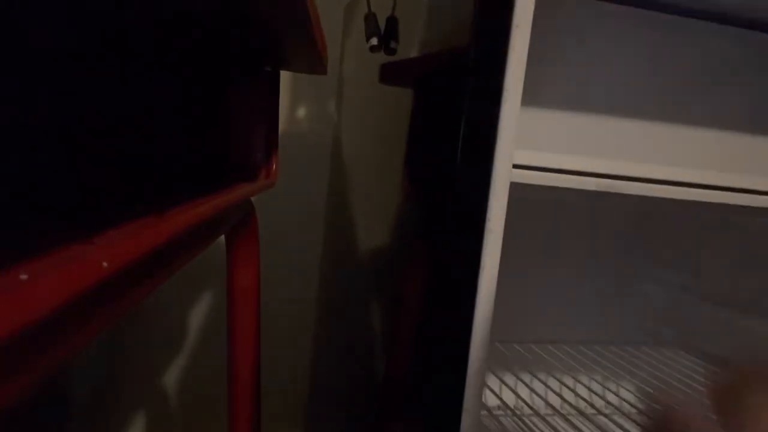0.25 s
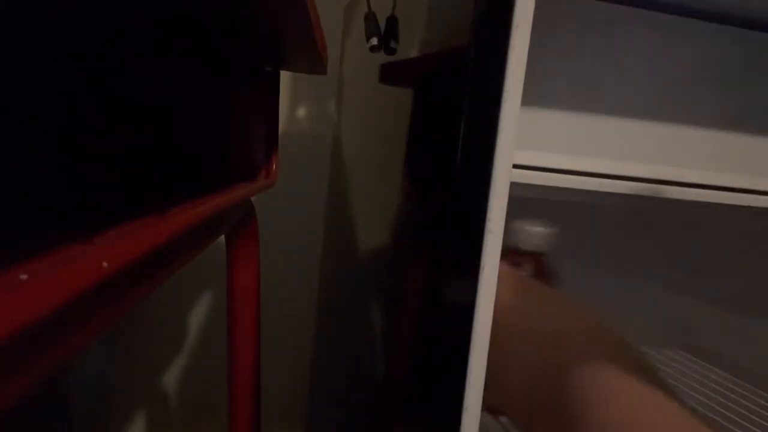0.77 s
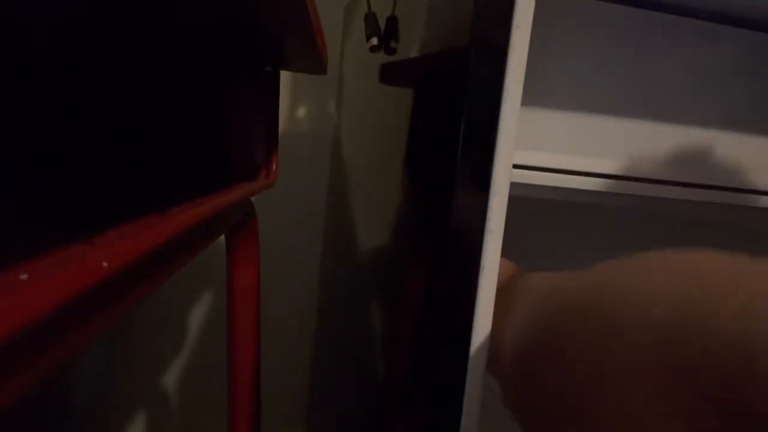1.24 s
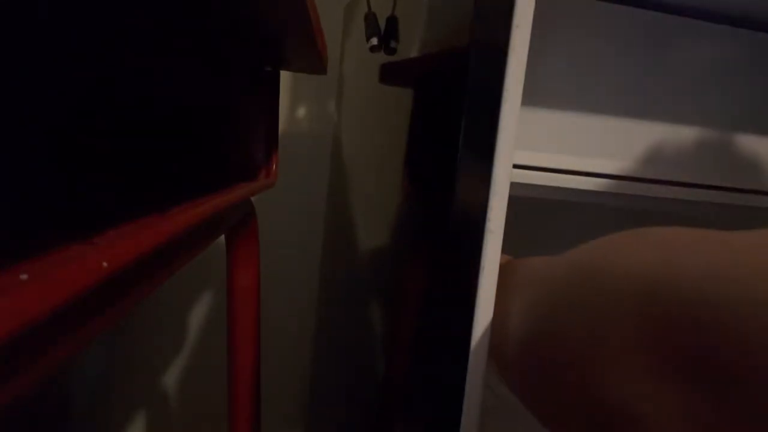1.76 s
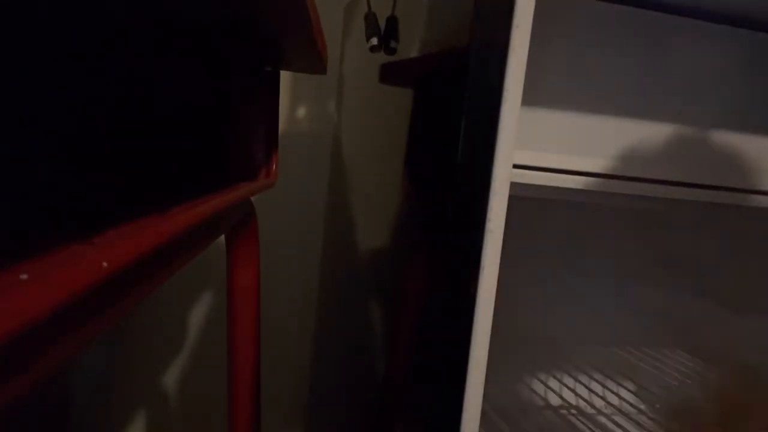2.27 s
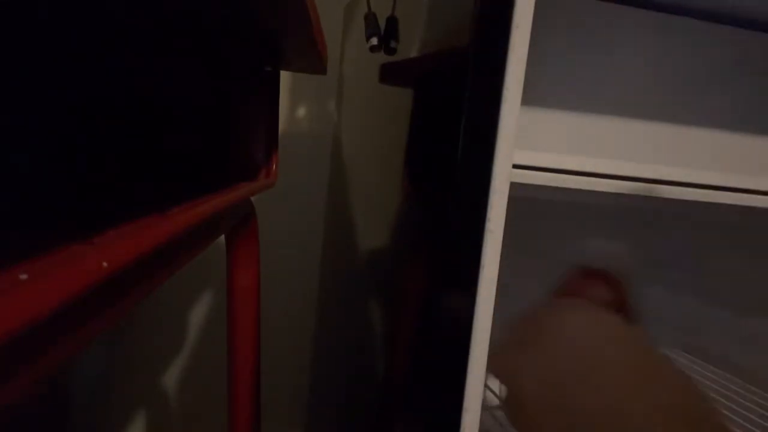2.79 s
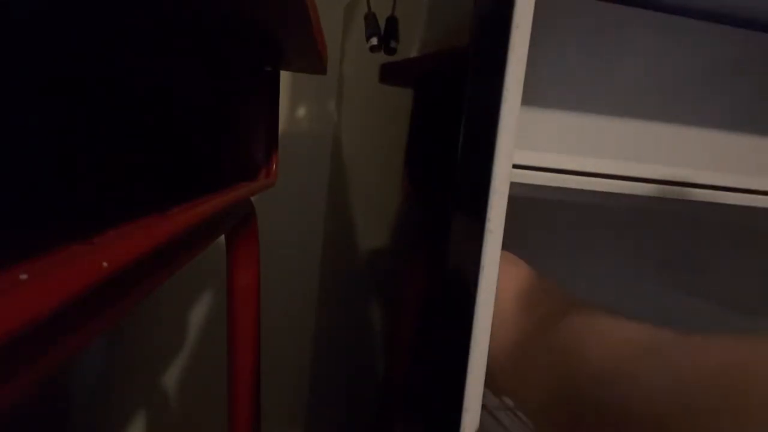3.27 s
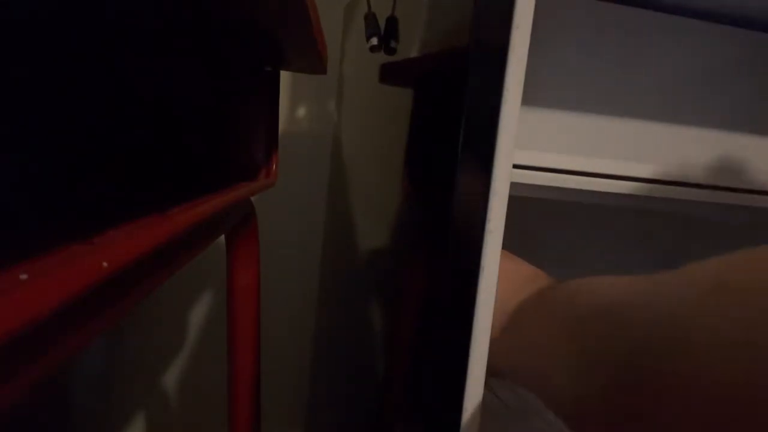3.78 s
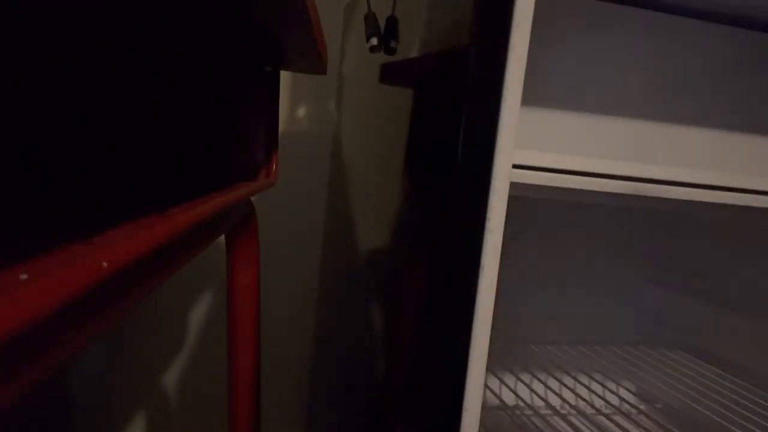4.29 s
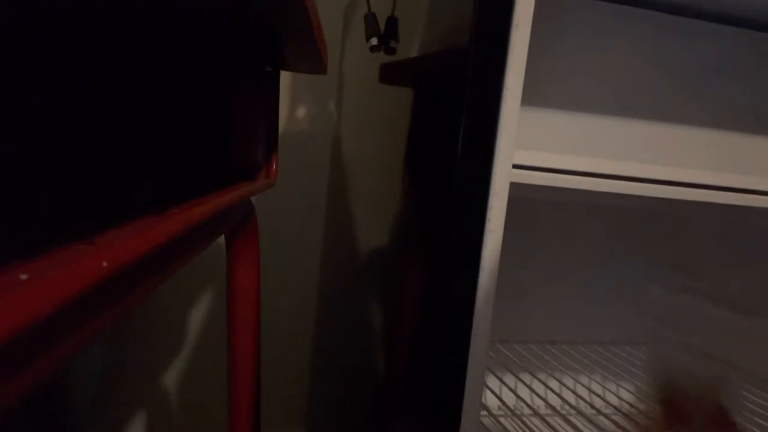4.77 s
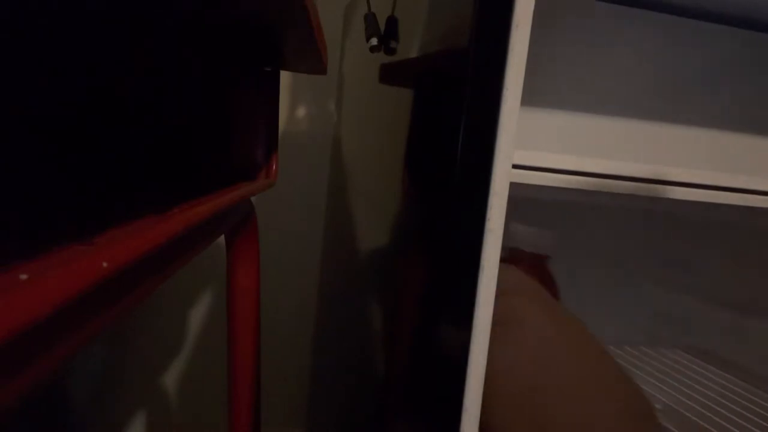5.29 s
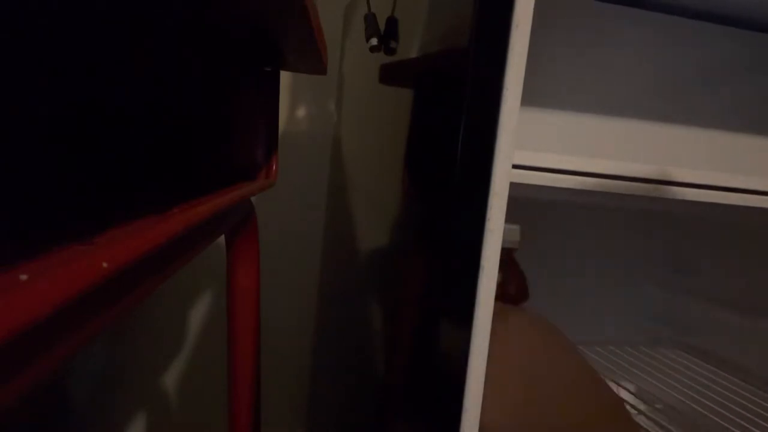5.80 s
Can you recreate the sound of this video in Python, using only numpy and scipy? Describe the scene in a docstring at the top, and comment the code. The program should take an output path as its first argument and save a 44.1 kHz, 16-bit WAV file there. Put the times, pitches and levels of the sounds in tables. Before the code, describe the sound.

Close, wide stereo: bottles rock onto thin metal wires in an empty fridge, ringing and booming three times, with faint finger ticks between.

```python
"""Bottles on a fridge shelf

Bottles are set down one by one on the wire shelf of a small open fridge, heard in a wide stereo image.
Decaying modes make the cabinet boom, the wires ring and the frame linger; noise bursts make rattles, cracks,
ticks of fingers and labels, and a sliding hand. One wire, a drifting sine, sings on in spells.
Coloured noise hums, drones, hisses and rustles underneath, with thin whistles made of wandering tones.
The level dips briefly three times; left and right differ in phase and balance from band to band."""
import sys
import numpy as np
from scipy import signal
from scipy.fft import rfft, irfft, next_fast_len
from scipy.io import wavfile
from scipy.ndimage import uniform_filter1d, map_coordinates

SR = 44100
rng = np.random.default_rng(int(sys.argv[2]) if len(sys.argv) > 2 else 0)


def how_loud(loudness_db):
    """Turn decibels into a plain amplitude multiplier (0 dB gives 1, 20 dB gives 10)."""
    steps = np.asarray(loudness_db, float) / 20
    return 10 ** steps


def generate_wav(signal):
    """Clip the signal to [-1, 1] and save it as 16-bit WAV at the path in sys.argv[1]."""
    frames = np.transpose(np.atleast_2d(signal))
    scaled = np.clip(frames, -1, 1) * 32767
    pcm = np.round(scaled).astype(np.int16)
    wavfile.write(sys.argv[1], SR, pcm)


N = 266584

# bottle on shelf contacts, before the trims of each layer: (time [s], wires [dB],
# cabinet [dB re wires], rattle [dB re wires], crack [dB re wires])
CONTACTS = [(0.735, -40, -10, -2.5, -5.5), (0.747, -37, 7, -4, -16), (0.751, -29.5, 19, -15, -11.5),
            (0.763, -36.5, -1, -2, -22), (0.783, -16, 7.5, -12, -20.5), (0.809, -31.5, 18.5, -2, -18),
            (0.832, -16.5, -6.5, -10.5, -19.5), (0.847, -17.5, -6, -17, -66), (0.869, -29, 14.5, -10, -33),
            (0.893, -30.5, 1, -10, -29), (0.926, -24, 7.5, -20, -39), (0.959, -30, 6, -23, -40),
            (0.998, -27.5, 5, -25, -37), (1.128, -47.5, 26.5, -5.5, -19), (1.172, -40, 16.5, -29, -8),
            (2.753, -29.5, -9, -17, -7), (2.761, -18, 9, -13.5, -23), (2.784, -17.5, 9, -31, -38),
            (2.801, -17, 8.5, -24, -27), (2.827, -15.5, 8.5, -18, -31), (2.86, -28, -16, -13.5, -25),
            (2.879, -21, 4, -31, -43), (2.904, -37, 9, -30, -40), (2.939, -28, 9.5, -20, -36),
            (2.965, -41.5, -4, -4, -18), (2.988, -23.5, 6, -17.5, -30), (3.025, -32, 14, -13, -16),
            (3.046, -33, -8, -11.5, -28), (3.093, -38, 19, -22, -22), (3.261, -46, 19.5, -10.5, -35),
            (5.095, -31.5, -8, -11, -11), (5.106, -18.5, -1, -16.5, -17), (5.114, -19, 12.5, -17, -37),
            (5.137, -17.5, 2.5, -17, -31), (5.16, -19.5, -11, -28, -24.5), (5.183, -20.5, 2.5, -42, -29),
            (5.21, -32, -2, -37, -37), (5.237, -44.5, 15, -24, -5), (5.269, -37, 2, -6, -14),
            (5.299, -37.5, 15.5, -31, -21), (5.869, -47.5, -9, -5, -9), (5.904, -46, 22.5, -9, -25),
            (5.951, -44, 19.5, -7.5, -22)]
# a bottle lands: (first touch [s], strength [dB], rise of the shelf's shudder [s],
# t60 of the shudder [s], brightness of the frame [dB per octave])
LANDINGS = [(0.735, -33, 0.16, 0.81, 2), (2.752, -31.5, 0.27, 1.35, -1), (5.094, -31.5, 0.087, 0.87, -1.5)]
# air in the cabinet: (frequency [Hz], density [dB per Hz])
CAVITY = [(60, -71), (150, -10), (450, 9), (700, -10.5), (1500, -17), (3000, -24), (6000, -33)]
# sharp top of a hard contact: (frequency [Hz], density [dB per Hz])
CRACK = [(5000, -51), (7000, 8), (11000, -6), (12500, 0), (13500, -11), (15800, -6)]
# dull body of a touch: (frequency [Hz], density [dB per Hz])
TAP = [(700, -6), (1100, 11), (1700, 13.5), (2500, 4.5), (3500, -12), (5000, -38)]
# brief dips of the level: (centre [s], half length [s])
DIPS = [(0.118, 0.044), (2.447, 0.031), (4.615, 0.032)]


def unit(x):
    """Each row brought to rms 1."""
    return x / np.sqrt(np.mean(x ** 2, -1, keepdims=True) + 1e-20)


def filtered(x, response):
    """x times a complex response of frequency."""
    m = next_fast_len(x.shape[-1] + 4096)
    return irfft(rfft(x, m) * response(np.fft.rfftfreq(m, 1 / SR)), m)[..., :x.shape[-1]]


def noise(spectrum, size=N):
    """Two unrelated noises of rms 1 coloured by (Hz, dB) points."""
    f, db = np.transpose(spectrum)

    def colour(hz):
        return how_loud(np.interp(np.log(hz + 1), np.log(f), db, left=-120, right=-120))
    return unit(filtered(rng.standard_normal((2, size)), colour))


def wobble(rate):
    """A smooth random curve, rate knots a second."""
    knots = rng.standard_normal(int(N * rate / SR) + 4)
    return map_coordinates(knots, [np.arange(N) * rate / SR])


def add(track, s, sound):
    """Mixes a sound into the track from time s."""
    part = track[:, round(s * SR):][:, :sound.shape[1]]
    part += sound[:, :part.shape[1]]


def puffs(spectrum, times, dbs, t60, attack, grain_db):
    """Bursts of coloured noise that die away; a fast random gain makes them grainy."""
    power, t = np.zeros((1, N)), np.arange(SR // 2) / SR
    for s, db, fall in np.broadcast(times, dbs, t60):
        envelope = how_loud(db - 60 * t / fall) * (1 - np.exp(-t / attack))
        add(power, s, envelope[None] ** 2)
    return np.sqrt(power) * noise(spectrum) * unit(how_loud(grain_db * wobble(400)))


def patchy(x, depth_db):
    """Random patches of gain over time and frequency, the same in both fields."""
    z = signal.stft(x, nperseg=512)[2]
    field = rng.standard_normal(z.shape[1:])
    field = uniform_filter1d(uniform_filter1d(field, size=2, axis=0), size=12, axis=1)
    return signal.istft(z * how_loud(depth_db * field / field.std()), nperseg=512)[1][:, :N]


def ringer(modes, attack, scatter_db, split, loose=1, wander=0, sides=(-1j, 1j)):
    """A striker for decaying modes, each a close beating pair, a quarter turn apart in the two fields."""
    hz, db, t60 = np.repeat(np.transpose(modes), 2, axis=1)[:, :, None]
    hz = hz * (1 + split * np.resize([-1, 1], hz.shape))
    t = np.arange(SR * 3 // 5) / SR
    bank = how_loud(db - 60 * t / t60) * np.exp(2j * np.pi * hz * t) * (1 - np.exp(-t / attack))

    def strike(near_hz=1, fall_db=0):
        """One blow with new phases and strengths, weaker by fall_db per octave away from near_hz."""
        size, turn = rng.standard_normal(len(hz)), rng.random(len(hz))
        side = rng.choice(sides, len(hz))
        favour = how_loud(-fall_db * abs(np.log2(hz[:, 0] / near_hz)))
        favour = favour / np.linalg.norm(favour * how_loud(db[:, 0]))
        blow = favour * how_loud(scatter_db * size) * np.exp(2j * np.pi * (loose * turn - 1 / 4))
        fields = (np.array([blow, side * blow]) @ bank).real
        # each blow's pitch is off by a small random amount
        bent = np.arange(len(t)) * (1 + wander * rng.standard_normal())
        return np.array([np.interp(bent, np.arange(len(t)), y) for y in fields])
    return strike


def fridge_and_arm():
    """Noise bands: hum and drone swell as the shelf shudders; rustle and hiss follow the arm."""
    # all four spectra: (frequency [Hz], density [dB per Hz])
    hiss_spectrum = [(2600, -20), (3300, 1.5), (4200, 3), (5000, 1.5), (8000, 2), (10000, -3), (12500, -5),
                     (13600, -6.5), (14200, -20), (15700, -10)]
    hum_spectrum = [(22, -32), (32, -45), (45, -3), (60, -1.5), (85, -3.5), (125, 1.5), (180, -0.5),
                    (250, -9), (330, -56)]
    drone_spectrum = [(220, -11), (300, -3), (377, 3.5), (450, -5.5), (620, -7.5), (800, -18.5),
                      (1100, -18.5), (1500, -90)]
    rustle_spectrum = [(900, 1), (1250, 0.5), (1600, -3), (2300, -1.5), (3000, -2), (3600, -43)]
    # arm and sleeve moving: (time [s], rustle before its swell [dB])
    movement = [(0, -62), (.15, -65.5), (.34, -65.5), (.69, -67.5), (.95, -59), (1.4, -63), (1.92, -63.5),
                (2.05, -67.5), (2.37, -64), (2.7, -67.5), (3.0, -56.5), (3.2, -67.5), (3.36, -66),
                (3.73, -69), (3.76, -62), (3.89, -61), (3.97, -66), (4.4, -61), (4.55, -61), (4.76, -66),
                (5.2, -64), (6.04, -65.5)]
    t = np.arange(N) / SR
    shudder = np.zeros(N)
    for s, db, rise, t60, _ in LANDINGS:
        decay = how_loud(db - 60 * np.maximum(t - s - rise, 0) / t60)
        shudder += decay * np.clip((t - s) / rise, 0, 1)
    moving_db = np.interp(t, *np.transpose(movement))
    # the hiss takes nearly all of the movement's swing
    hiss = how_loud(-63 + 0.98 * (moving_db - moving_db.mean()))
    hum = np.hypot(how_loud(-44), shudder)
    drone = np.hypot(how_loud(-49), how_loud(-6) * shudder)
    layers = [(hiss, hiss_spectrum, 1.84), (hum, hum_spectrum, 0.24),
              (drone, drone_spectrum, 1.06), (how_loud(moving_db), rustle_spectrum, 0.12)]
    out = np.zeros((2, N))
    for level, spectrum, swell_db in layers:
        out += level * how_loud(swell_db * wobble(13)) * noise(spectrum)
    return patchy(out, depth_db=2.5)


def whistles():
    """Whistles of the cooling circuit: a slow random phasor spreads each tone into a narrow band."""
    # (frequency [Hz], nominal width [Hz], level before drift and flicker [dB], from [s], to [s])
    whines = [(364.4, 18, -52.5, 3.5, 5.3), (2760, 20, -77, 0.9, 7.1), (2880, 20, -79, -0.5, 0.8),
              (2830, 40, -76, 2.46, 2.8), (2400, 30, -76, 2.25, 4.7), (2050, 25, -76, 3.7, 7.1),
              (3200, 30, -79, 1.2, 4.7), (3310, 50, -79, -0.5, 7.1), (4790, 40, -73, 1.95, 2.44),
              (4800, 90, -81, -0.5, 5.4), (4910, 45, -70, 2.46, 3.08), (4900, 80, -74, 4.14, 4.36),
              (4830, 120, -72, 5.42, 5.66), (5190, 200, -77, 1.1, 7.1)]
    edge_s, flicker_db = 0.06, 2
    out, t = np.zeros((2, N)), np.arange(N) / SR
    for hz, width_hz, db, start, end in whines:
        phasor = wobble(width_hz) + 1j * wobble(width_hz)
        tone = how_loud(db + flicker_db * wobble(9.8)) * phasor * np.exp(2j * np.pi * hz * t)
        tone = tone * np.clip(np.minimum(t - start, end - t) / edge_s + 0.5, 0, 1)
        out += [tone.real, tone.imag]
    return out


def opening_shudder():
    """Low decaying sines, cut at the centre of the first dip, while the cavity rings as fading noise."""
    # (frequency [Hz], level [dB], t60 [s])
    low_tones = [(36, -29, 1), (91, -34.5, 0.97), (126, -45, 0.59)]
    out, t = np.zeros((2, N)), np.arange(N) / SR
    for hz, db, t60 in low_tones:
        out[0] += how_loud(db - 60 * t / t60) * np.sin(2 * np.pi * hz * t) * (t < DIPS[0][0])
    return out + puffs(CAVITY, 0, -33.5, 0.26, 0.0092, grain_db=-11.5)


def ticks():
    """Fingers, caps and labels touch: dry noise bursts with a dull body and a sharp crack."""
    # before the trims of each layer: (time [s], level [dB], low part [dB re level], crack [dB re level])
    touches = [(0.194, -45, -4.5, -10.5), (0.258, -55.5, 9, -21), (0.346, -42, -3, -18),
               (0.454, -54, 13, -21), (1.773, -40.5, 0.5, -15), (1.833, -46, -4, -14),
               (1.85, -51, 7, -15.5), (1.889, -39.5, 9, -16.5), (2.481, -47, -3, -20),
               (3.784, -60.5, -24, 2), (5.0371, -28, 3, -23.5), (5.239, -44, -10, -9.5),
               (5.3363, -35, -2, -18), (5.423, -42.5, -17, -10.5), (5.4394, -48.5, -18, -10),
               (5.579, -50, -28, -12), (5.6455, -33, -38, -11), (5.866, -43, -14, -11),
               (5.874, -39, -20, -12.5), (5.915, -40, -3, -21), (5.93, -38, -0.5, -9),
               (6.033, -50.5, 4, -9.5)]
    # (frequency [Hz], density [dB per Hz])
    tick_spectrum = [(2000, -10), (3000, 2), (4500, 2.5), (6500, 3), (9000, -14), (11000, -79)]
    s, db, low_db, crack_db = np.transpose(touches)
    t60 = 0.076  # seconds
    out = puffs(tick_spectrum, s, db - 6.0, t60, 0.001, grain_db=-2.0)
    out += puffs(TAP, s, db + low_db - 8.5, t60, 0.0012, grain_db=-6.0)
    return out + puffs(CRACK, s, db + crack_db + 10.0, 0.068, 0.00069, grain_db=3.0)


def shelf_ringing():
    """Each contact sets off decaying modes of cabinet and wires; the next one stifles them."""
    # all three sets of modes: (frequency [Hz], relative level [dB], t60 when not stifled [s])
    cabinet_modes = [(114, -53, 0.43), (129, 10, 0.12), (153.3, 4.5, 0.44), (213.2, -3.5, 0.28)]
    wire_modes = [(275, -11.5, 0.21), (302, -0.5, 0.14), (372.3, -11, 0.3), (437.3, -2.5, 0.17),
                  (483.4, -2.5, 0.28), (570, 1.5, 0.089), (629, -5.5, 0.45), (691.4, -11.5, 0.16)]
    upper_modes = [(827, 8.5, 0.11), (869, 4.5, 0.42), (950, 1, 0.19), (1006, 7.5, 0.25), (1085, 5, 0.29),
                   (1216, -7.5, 1), (1291, -2, 0.22), (1340, 9, 0.21), (1640, -7, 0.15), (1893, 3, 0.16),
                   (2066, -16, 0.63), (2177, 1, 0.17), (2230, -3.5, 0.2), (2367, 3.5, 0.24),
                   (2615, 3.5, 0.095), (2830, 1, 0.066), (3100, -4, 0.044), (3250, -4, 0.16),
                   (3300, -22, 0.13)]
    # the rocking bottle's contact wanders over the shelf: (time [s], pitch of the wires struck best [Hz])
    contact_path = [(0.75, 367), (0.783, 487), (0.81, 605), (0.832, 430), (0.847, 475), (0.869, 560),
                    (0.893, 600), (0.925, 560), (1.0, 624), (2.753, 400), (2.784, 440), (2.801, 537),
                    (2.827, 477), (2.879, 553), (2.94, 530), (3.0, 614), (3.26, 620), (5.096, 448.5),
                    (5.114, 410), (5.137, 300), (5.16, 362), (5.183, 564), (5.24, 614)]
    # each bottle stands elsewhere: (time [s], pitch of the upper modes struck best [Hz])
    footing = [(0.8, 1120), (2.8, 2900), (5.1, 1010)]
    choke_db, choke_s = 14, 0.0073  # full stifling, and its time constant
    # a soft push starts the panels nearly in step
    cabinet = ringer(cabinet_modes, 0.012, scatter_db=0.0, split=0.013, loose=0.3)
    wires = ringer(wire_modes, 0.00084, scatter_db=2.5, split=0.011, wander=0.0097, sides=[1j, 1j, -1j])
    upper = ringer(upper_modes, 0.00055, scatter_db=3.5, split=0.0121, wander=0.0195)
    out, t = np.zeros((2, N)), np.arange(SR * 3 // 5) / SR
    for now, following in zip(CONTACTS, CONTACTS[1:] + CONTACTS[:1]):
        s, db, boom_db, rattle_db, _ = now
        then, next_db, next_boom_db, *_ = following
        # the last contact is followed by none, so nothing stifles it
        stifled = (then > s) * (1 - np.exp(-np.maximum(t - then + s, 0) / choke_s))

        def choke(over_db):
            """A much weaker next contact stifles little."""
            return how_loud(-choke_db * stifled / (1 + how_loud(2 * over_db)))
        boom = how_loud(db + boom_db - 3.5) * cabinet()
        boom = boom * choke(db + boom_db - next_db - next_boom_db)
        wire_hz = np.interp(s, *np.transpose(contact_path))
        upper_hz = np.interp(s, *np.transpose(footing))
        ring = how_loud(db - 1.0) * wires(wire_hz, fall_db=17.5)
        ring += how_loud(db + rattle_db + 2.5) * upper(upper_hz, fall_db=1)
        add(out, s, boom + choke(db - next_db) * ring)
    return out


def shelf_rattle():
    """At each contact noise bursts make the wires rattle and crack and fill the cavity."""
    # (frequency [Hz], density [dB per Hz])
    rattle_spectrum = [(700, -36), (1000, -20), (1500, -5), (2200, 0.5), (3500, 3), (5000, -3), (7000, 0),
                       (9000, -28)]
    s, db, _, rattle_db, crack_db = np.transpose(CONTACTS)
    out = puffs(rattle_spectrum, s, db + rattle_db - 7.0, 0.1, 0.00047, grain_db=1.0)
    out += puffs(CRACK, s, db + crack_db + 0.5, 0.12, 0.0016, grain_db=5.0)
    return out + puffs(CAVITY, s, db - 9.5, 0.22, 0.004, grain_db=-1.5)


def lingering_frame():
    """Frame and cabinet tones die slowly after each landing, fluttering in level and phase."""
    # (frequency [Hz], level before brightness and flutter [dB re landing], t60 [s])
    frame_tones = [(108.7, 0, 0.57), (212.5, 2.5, 1.12), (327, 13, 0.37), (913, -10, 0.32),
                   (1217, -10.5, 2.44), (1390, -12.5, 0.84), (1980, -26.5, 0.85), (2010, -25, 0.88),
                   (818, -16.5, 2), (2380, -25, 1)]
    rough = 0.0005  # radians of phase shake per Hz: the higher tones blur into narrow noise
    out, t = np.zeros((2, N)), np.arange(2 * SR) / SR
    for s, strength_db, rise, _, bright_db in LANDINGS:
        for hz, db, t60 in frame_tones:
            tilt_db = bright_db * np.log2(hz / frame_tones[0][0])
            flutter_db = 4.3 * wobble(15.5)[:len(t)]
            level = how_loud(strength_db + db + tilt_db - 60 * t / t60 + flutter_db)
            phase = 2 * np.pi * hz * t + rough * hz * wobble(45.2)[:len(t)]
            tone = level * (1 - np.exp(-t / 0.004)) * np.sin(phase)
            add(out[:1], s + rise / 2, tone[None])
    return out


def singing_wire():
    """One lightly damped wire sings in spells as the bottle rocks: a drifting sine and faint octave."""
    # (start [s], length [s], level at the start before sag and flutter [dB])
    spells = [(0.893, 0.017, -27), (0.994, 0.018, -35), (1.07, 0.036, -39.5), (1.13, 0.053, -44.5),
              (1.297, 0.15, -49.5), (2.966, 0.034, -36), (3.007, 0.34, -54.5), (3.057, 0.1, -45.5),
              (3.089, 0.03, -35.5), (3.187, 0.05, -38.5), (3.267, 0.032, -42.5), (3.396, 0.068, -44.5),
              (3.49, 0.053, -46.5), (3.605, 0.098, -48.5), (5.2, 0.059, -36.5), (5.28, 0.1, -55),
              (5.4, 0.065, -51.5), (5.477, 0.049, -41), (5.535, 0.16, -43.5), (5.688, 0.042, -53),
              (5.82, 0.12, -49.5)]
    pitch_hz, drift_hz = 610, 4.05
    edge_s, sag_db_per_s = 0.021, 26
    flutter_db, octave_db = 1.5, -28
    t, level = np.arange(N) / SR, np.zeros(N)
    for s, length, db in spells:
        gate = np.clip(np.minimum(t - s, s + length - t) / edge_s + 0.5, 0, 1)
        level += how_loud(db - sag_db_per_s * (t - s)) * np.sin(np.pi / 2 * gate) ** 2
    phase = 2 * np.pi * np.cumsum(pitch_hz + drift_hz * wobble(9.8)) / SR
    fields = np.array([np.sin(phase) + how_loud(octave_db) * np.sin(2 * phase), np.cos(phase)])
    return level * how_loud(flutter_db * wobble(40)) * fields


def clinks():
    """Bottle touches bottle: a short dull burst of noise and the decaying modes of the neck."""
    # before the trims of each layer: (time [s], level [dB], body [dB re level], pitch [Hz])
    meetings = [(3.344, -32, 6.5, 1800), (4.061, -38, 11.5, 1824), (5.467, -52, -3, 1870),
                (5.876, -45, 0, 1900)]
    # (frequency [Hz], density [dB per Hz])
    body_spectrum = [(380, -45), (520, 13), (680, 0), (850, -7), (1050, -6), (1400, -13), (1800, -15),
                     (2600, -18.5), (4500, -42)]
    # (multiple of the pitch [ratio], relative level [dB], t60 [s])
    neck_modes = [(.28, -5, 0.23), (.57, -6, 0.11), (.85, -10, 0.07), (1, -1.5, 0.097), (1.26, -5, .055),
                  (1.83, -20, 0.078), (2.05, -11, 0.068)]
    s, db, body_db, pitch = np.transpose(meetings)
    out = puffs(body_spectrum, s, db + body_db - 10.5, 0.25, 0.0012, grain_db=-0.5)
    for start, level_db, hz in zip(s, db, pitch):
        modes = np.multiply(neck_modes, [hz, 1, 1])
        neck = ringer(modes, 0.0025, scatter_db=1.0, split=0.005, loose=0.08, sides=[-1j])
        add(out, start, how_loud(level_db - 3.5) * neck())
    return out


def sliding_hand():
    """A hand slides softly along a bottle: slow-starting bursts of dull noise."""
    # (time [s], level [dB], t60 [s])
    slides = [(4.21, -58, 0.68), (4.43, -57, 0.59), (4.51, -53, 0.53)]
    s, db, t60 = np.transpose(slides)
    return puffs(TAP, s, db, t60, 0.034, grain_db=2.5)


def scene():
    """Two sound fields: the one both channels share and the one they carry with opposite sign."""
    background = fridge_and_arm() + whistles() + opening_shudder()
    shelf = shelf_ringing() + shelf_rattle() + lingering_frame() + singing_wire()
    hands_and_bottles = ticks() + clinks() + sliding_hand()
    return background + shelf + hands_and_bottles


def stereo_spread(hz):
    """How the two fields are spread over left and right channel, by phase lead, likeness and balance."""
    # (frequency [Hz], phase lead of the right channel [radians], likeness [0-1], left minus right [dB])
    spread_curves = [(0, 0, .9, 2), (170, .2, .75, 4.5), (230, 2.4, .4, 0), (330, 2.8, .6, -1.5),
                     (500, 2.7, .4, -1), (640, 1.8, .7, 0), (900, 2.6, .5, 0), (1220, 3.1, .5, 1.5),
                     (2000, 5.9, .5, 0), (3000, 11.6, .55, -2.5), (5000, 18.5, .45, -6),
                     (6500, 16.3, .45, -2.5), (7200, 15.71, .98, 0), (8300, 15.71, .97, 0),
                     (9700, 13.6, .75, 0), (10400, 12.57, 1, 0), (12700, 12.57, 1, 0), (13400, 11, .5, 0),
                     (14100, 9.42, 1, 0)]
    f, lead, likeness, balance_db = np.transpose(spread_curves)
    turn = np.arccos(np.clip(np.interp(hz, f, likeness), 0, 1)) / 2
    left = how_loud(np.interp(hz, f, balance_db) / 2) * np.exp(-0.5j * np.interp(hz, f, lead))
    # rows are channels, columns are fields
    matrix = np.array([[np.cos(turn) * left, np.sin(turn) * left],
                       [np.cos(turn) / left, -np.sin(turn) / left]])
    return (hz < 15900) * matrix  # nothing passes above this


def roll_off(x):
    """The treble ends steeply here."""
    return signal.sosfilt(signal.butter(12, 14640, fs=SR, output="sos"), x)


def record(dry):
    """The fields spread into stereo; the level sinks to 3 percent and returns at each dip."""
    t = np.arange(N) / SR
    level = np.prod([np.clip(abs(t - s) / half, 0.03, 1) for s, half in DIPS], axis=0)
    mix = level * filtered(dry, stereo_spread).sum(axis=1)
    return roll_off(mix)


dry = scene()
out = record(dry)
generate_wav(out)
```